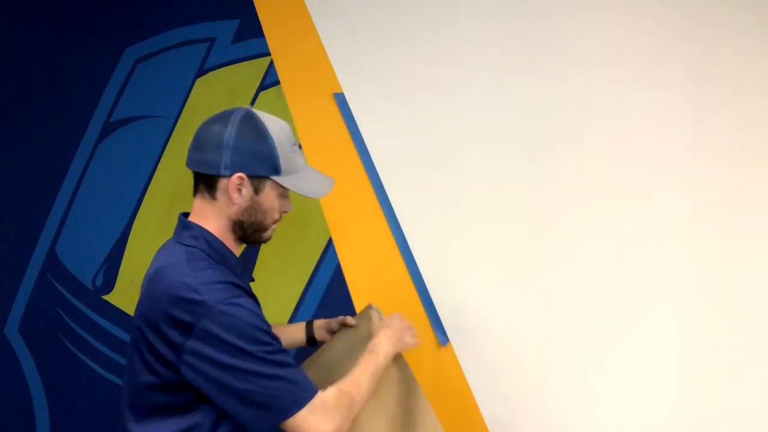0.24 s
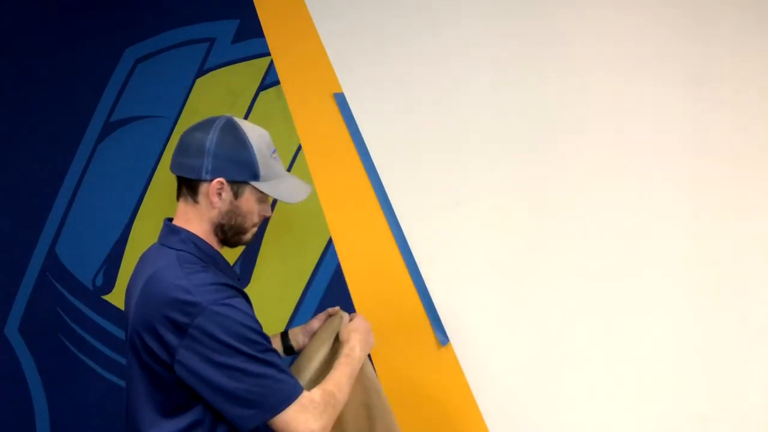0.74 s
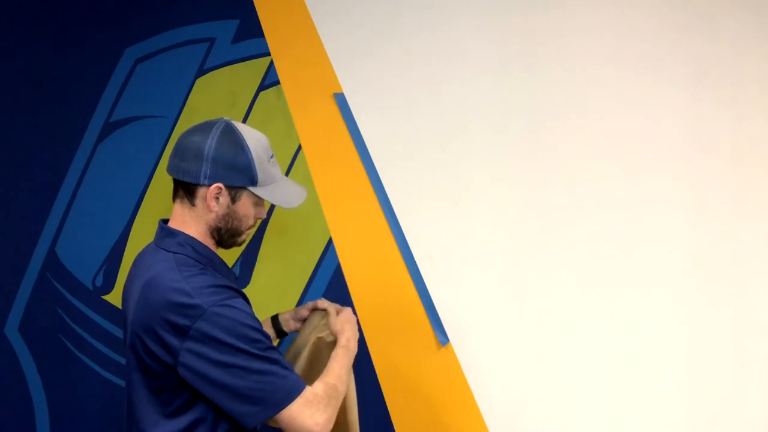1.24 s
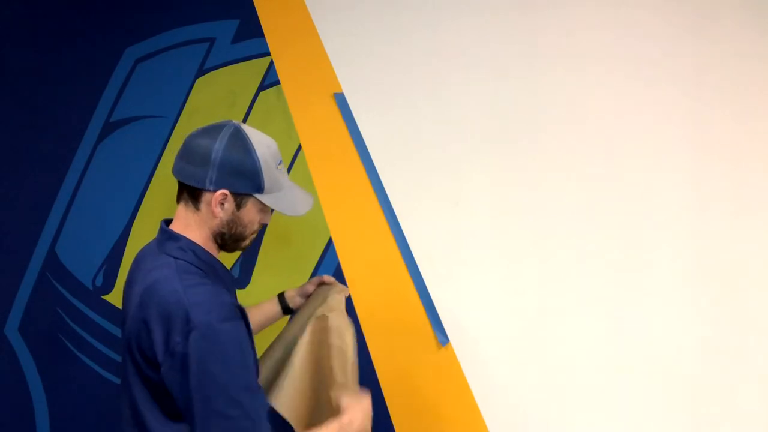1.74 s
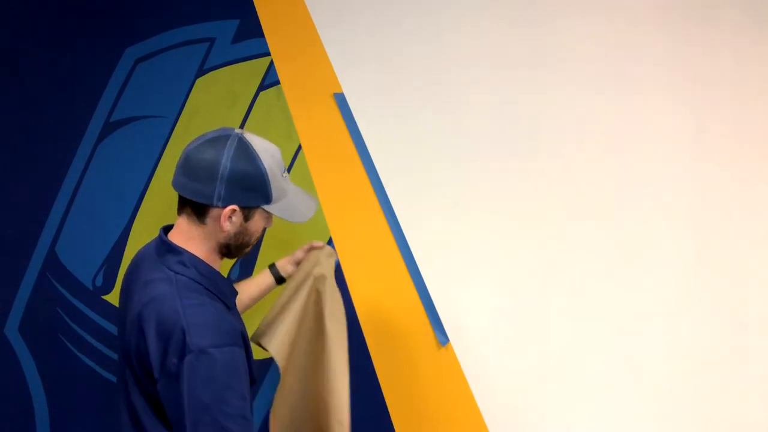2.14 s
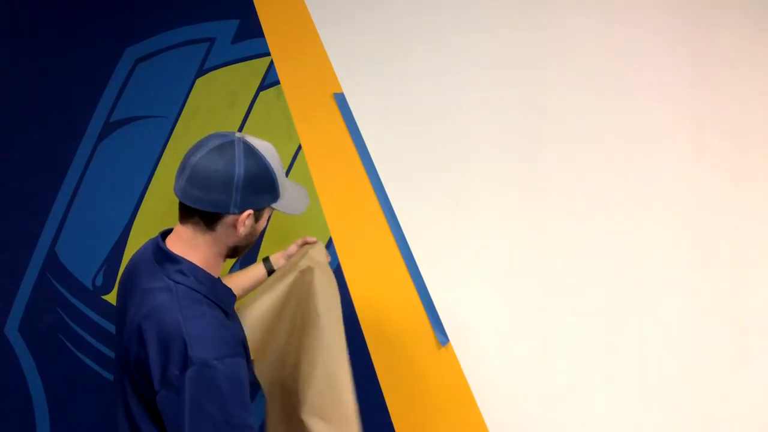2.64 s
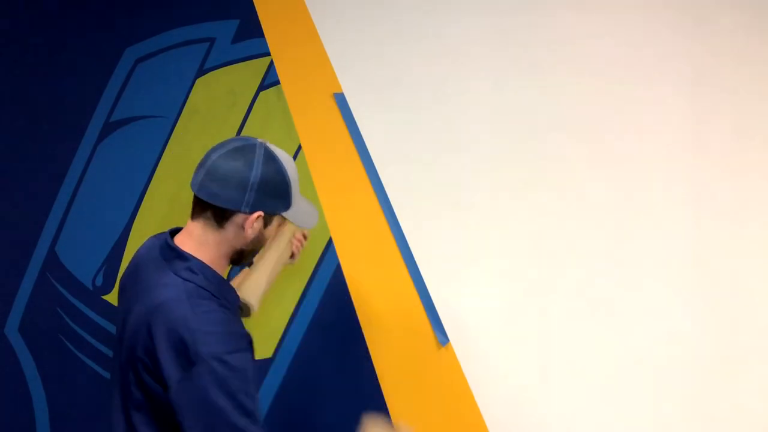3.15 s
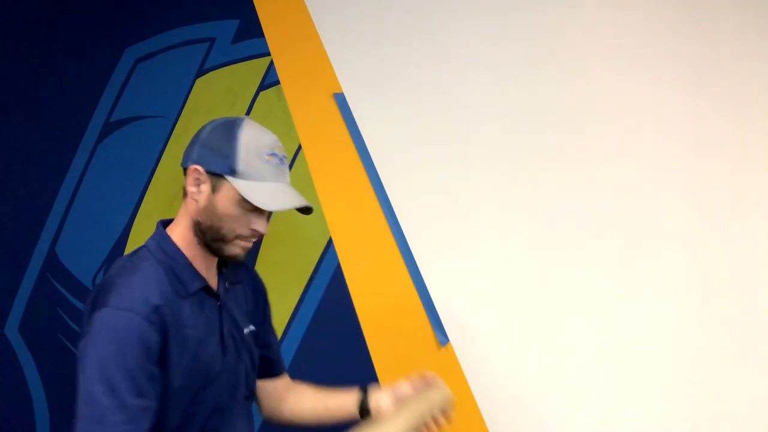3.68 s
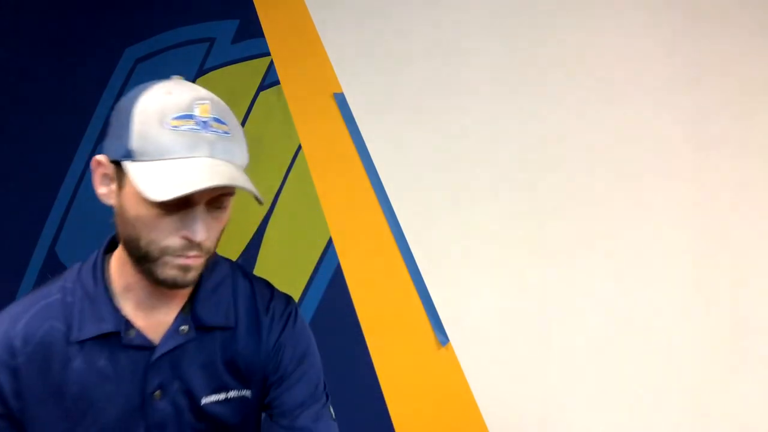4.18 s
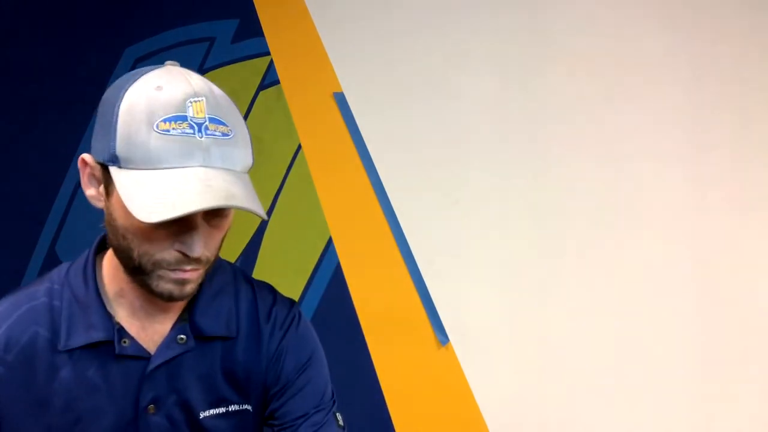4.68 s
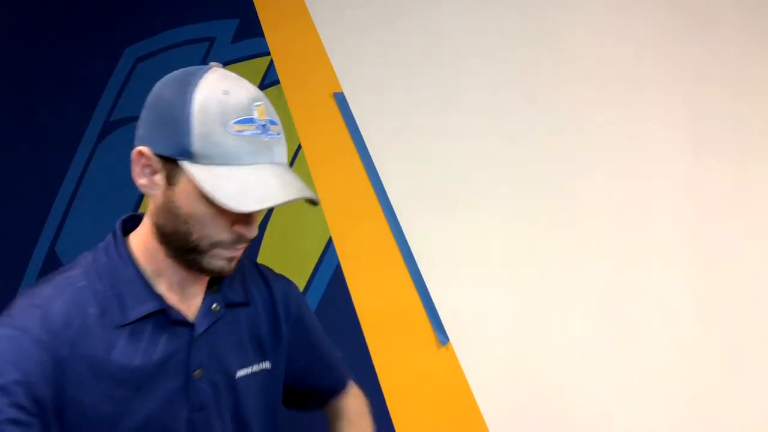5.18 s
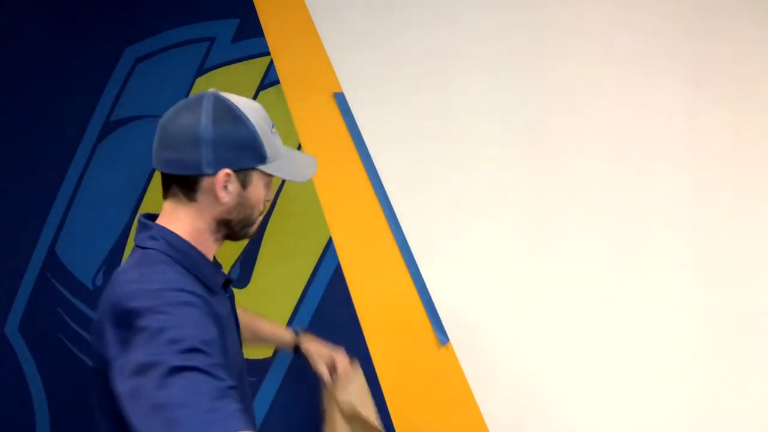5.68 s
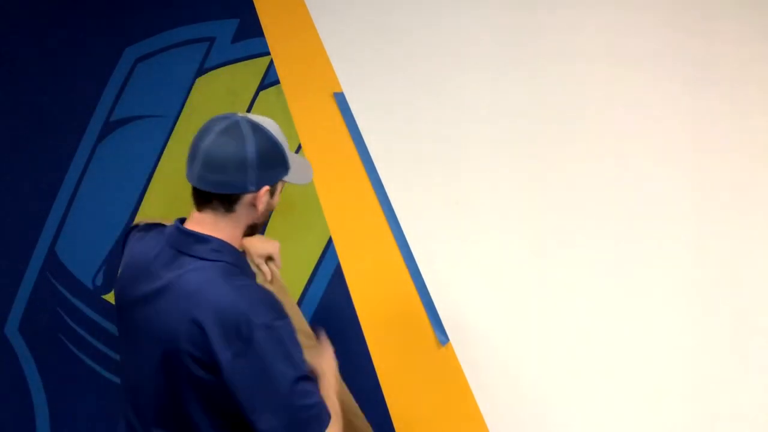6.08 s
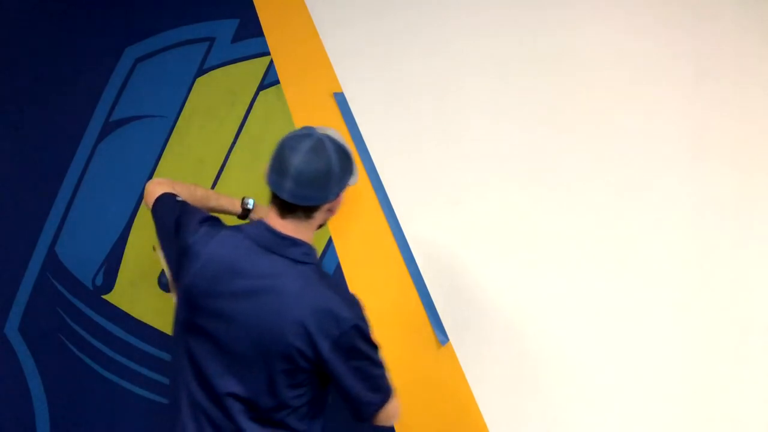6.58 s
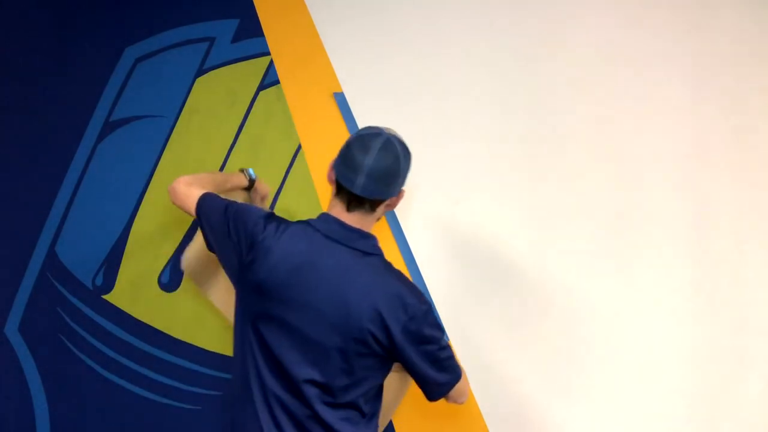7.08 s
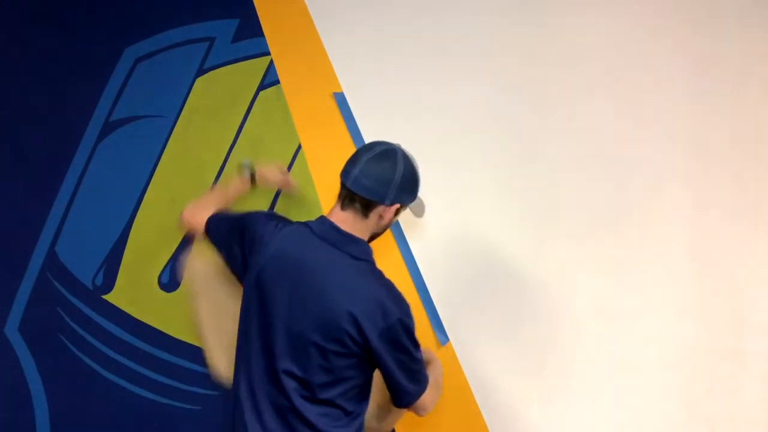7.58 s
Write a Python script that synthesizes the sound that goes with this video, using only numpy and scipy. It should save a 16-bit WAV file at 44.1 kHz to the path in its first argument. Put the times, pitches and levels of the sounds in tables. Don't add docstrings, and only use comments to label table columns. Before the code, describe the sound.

Indoors, thick paper is unrolled and bunched, with dry ticks and single pops growing denser, before a very short, jerky tear. Small rustles lead to a quick woody clunk-clunk as the cardboard roll is set on a table near the microphone. Then near quiet, and a renewed burst of crinkling as the sheet is lifted and pressed to a wall. Lively room echo, low ventilation murmur and hiss, centred sound.

```python
import sys
import numpy as np
from scipy import signal
from scipy.fft import rfft, irfft
from scipy.io import wavfile
from scipy.ndimage import uniform_filter1d

SR = 44100
rng = np.random.default_rng(int(sys.argv[2]) if len(sys.argv) > 2 else 0)


def dump(signal):
    limited = np.clip(np.atleast_2d(signal).T, -1, 1)
    pcm = np.round(limited * 32767).astype(np.int16)
    wavfile.write(sys.argv[1], SR, pcm)


def undo_db(level):
    steps = np.asarray(level, float) / 20
    return 10 ** steps


N = 345303

# f/Hz, level/dB (per Hz)
AIR = [(18, -30), (35, -16), (60, -4.5), (100, -8), (170, -14), (240, -11), (580, -21), (1900, -18),
       (2200, -23), (4080, -22), (10200, -32), (12300, -31), (16000, -40)]
# f/Hz, T60/s
ROOM = [(60, 0.43), (250, 0.7), (600, 0.54), (1500, 0.73), (4000, 0.62), (8000, 0.47), (15000, 0.26)]
# f/Hz, T60/s
TABLE = [(60, 0.38), (150, 0.5), (290, 0.81), (450, 0.15), (700, 0.41), (1000, 0.28), (3000, 0.14)]

# f/Hz, level/dB, T60/s
FIRST_END = [(73.8, -25.5, 0.31), (116.3, -12.5, 0.16), (230, 2, 0.028), (598, -15, 0.026)]
# f/Hz, level/dB, T60/s
ROCKING = [(464, -6, 0.034), (604, -9, 0.06), (770, -17, 0.028), (1025, -6, 0.016), (1880, -34, 0.037)]
# f/Hz, level/dB, T60/s
SECOND_END = [(118, -22, 0.26), (226, -14.5, 0.11), (522, -3, 0.052), (648, -13, 0.049), (928, 3.5, 0.031),
              (1310, -2.5, 0.017)]
# f/Hz, level/dB, T60/s
BOUNCE = [(546, -18, 0.043), (935, 3, 0.011)]
# f/Hz, level/dB, T60/s
SETTLING = [(146.6, -20.5, 0.3), (221.1, -23.5, 0.45), (257, -26, 0.33), (291, -26.5, 0.56),
            (330, -30, 0.58), (385, -1.5, 0.019), (525, -13, 0.033), (574, -30, .3), (636, -31, 0.38),
            (740, -29, 0.25), (900, -32, 0.56), (877, -16.5, 0.064), (1110, -35, 0.34)]

# f/Hz, level/dB (per Hz)
SHEET = [(41, -31), (70, -15.5), (119, -9.5), (220, 1), (482, 1), (576, -1), (650, -7), (840, -29.5),
         (1430, -120)]
# t/s (full), level/dB, rise/s, hold/s
FLIPS = [(.78, -48, 0.12, 0.017), (1.02, -41, 0.15, 0.033), (1.44, -47.5, 0.17, 0.19),
         (2.75, -46.5, 0.27, 0.13), (3.376, -53, .03, 0.026), (3.6, -59, .15, .08),
         (3.726, -50.5, 0.063, 0.03), (4.365, -41, .04, .02), (5.0, -55, .02, 0.0061),
         (5.66, -55, 0.34, 0.066), (5.98, -51, 0.16, 0.033), (6.36, -44, 0.1, 0.03), (6.52, -45, 0.1, 0.12),
         (6.95, -48.5, 0.22, 0.017), (6.75, -55, .1, 0.12), (7.02, -50, .02, 0.16), (7.49, -56, .05, 0.052),
         (7.78, -58, 0.067, .02)]

# f/Hz, level/dB (per Hz)
FIBRES = [(80, -38), (170, -22), (225, -9.5), (360, -21.5), (520, -15.5), (1000, -11.5), (2200, -7.5),
          (2800, -2), (3600, 2), (4600, 2), (7600, -0.5), (8600, -7), (12000, -13), (15700, -19.5),
          (16000, -17)]
# t/s, level/dB
TEAR_EFFORT = [
    (3.008, -55),
    (3.011, -32),
    (3.027, -19),
               (3.037, -14),
    (3.058, -25.5),
    (3.07, -20.5),
    (3.13, -24),
    (3.17, -42),
    (3.22, -37.5),
]
# t/s, extra level/dB
SNAGS = [
    (3.034, 3),
    (3.041, 7),
    (3.051, 7.5),
    (3.065, 6.5),
    (3.073, 0.5),
    (3.087, 11.5),
    (3.106, 2.5),
    (3.114, -2),
    (3.141, 10),
]

# f/Hz, level/dB (per Hz)
PAPER = [(320, -41.5), (550, -13.5), (770, -7.5), (937, -4), (1350, -2), (2400, -1), (4030, 3), (5410, -1),
         (7570, -4.5), (8590, -14), (13100, -24.5), (15700, -20)]
# t/s, peak level/dB, broad level/dB, crispness/dB
TICKS = [(0.207, -31.5, -9, -33), (1.0004, -19, -11.5, -9.5), (1.193, -33, -7, -1),
         (1.9418, -17.5, -26, -5), (2.851, -19, -14, -8), (3.9, -44, -17, -6), (3.941, -46, -11, -5),
         (4.064, -38.5, -12, -24), (4.322, -32, -23, -30), (4.61, -29.5, -5.5, -27.5),
         (4.9927, -29, -9.5, -16), (5.134, -28, -18, -18), (5.2, -18, -15, -17), (5.252, -29, -18, -10),
         (5.722, -26, -8, -18), (6.226, -27.5, -24, -12.5), (7.268, -23, -29, -6), (0.625, -37, -8, -2),
         (0.91, -30, 0, -8), (1.412, -26.5, -0.5, -1.5), (1.53, -28, -14, -6), (1.695, -31.5, -2, -15),
         (1.783, -27, -3, -20), (2.047, -21, -17, -9), (5.2977, -21, -18, -21), (6.3901, -23, -19, -8),
         (7.238, -27, -24, -7)]
# t/s, peak level/dB, broad level/dB,
# crispness/dB
BUCKLES = [(0.325, -46, -17, -6), (0.424, -35, -18, -18), (0.542, -26.5, -6.5, -5),
           (0.5728, -24.5, -26, -5), (0.7207, -21, -12.5, -10), (0.777, -22.5, -21, -5),
           (1.004, -21.5, -10, -12), (1.03, -13, -18, -23), (1.0995, -16.5, -18, -22),
           (1.169, -37, -13, 4), (1.236, -21, -15, -5), (1.345, -28, -18, 1), (1.6, -25, -15, -13),
           (1.643, -26.5, -4, -2), (1.7956, -14.5, -17, -10), (1.872, -23, -6, -4.5),
           (1.943, -23, -17, -7), (2.038, -14, -12, -6), (2.317, -19, -10, -21), (2.493, -18, -14, -14),
           (2.584, -17.5, -18, -18), (2.661, -16, -13.5, -12.5), (2.716, -20, -19.5, -2),
           (2.813, -21, -24.5, -7), (2.851, -17.5, -13.5, -11), (2.905, -22, -26, -3.5),
           (3.346, -33, -22, -7.5), (3.509, -22, -22, -18.5), (3.81, -27.5, -20, -27),
               (3.855, -28.5, -23, -20), (4.209, -31.5, -36, -20), (4.342, -41, -10, -27.5),
               (4.389, -36.5, 7, -18), (4.411, -30.5, 1, -25), (4.7133, -31, -20, -35),
               (4.926, -40, -41.5, -10), (5.2132, -13.5, -14.5, -6), (2.693, -31, -20, -6),
               (5.4985, -18.5, -19, -12), (5.612, -10.5, -19.5, -29), (6.173, -24.5, -17, -15),
               (6.305, -22, -20, -24), (6.374, -23, -16, -14), (6.423, -27, -22, 1), (6.511, -20, -14, -8),
               (6.569, -20, -14, -21), (6.705, -33, -16, -14), (7.5853, -20, -19, -11)]
# t/s (full), level/dB, rise/s, hold/s, crispness/dB
FOLDING = [(0.0, -39.5, .01, 0.015, -20), (0.102, -45.5, 0.072, 0.14, -46), (0.336, -53.5, .01, 0.13, -2),
           (0.424, -46.5, 0.036, 0.075, -10), (0.505, -47, .05, .03, -22), (0.546, -40, 0.032, 0.12, -4),
           (0.73, -41.5, 0.12, 0.22, -0.5), (0.903, -40, 0.18, 0.12, -4.5), (1.024, -32.5, 0.11, 0.036, -9),
           (1.163, -41, 0.11, 0.067, -6), (1.247, -28, .03, 0.02, -6.5), (1.386, -30, 0.14, 0.041, 1.5),
           (1.618, -38, 0.14, 0.029, -4), (1.774, -34.5, 0.37, 0.26, -5), (2.031, -31.5, .05, 0.033, -7),
           (2.21, -42, 0.091, 0.22, -14), (2.323, -38, 0.034, 0.045, -31), (2.428, -41.5, .1, 0.06, -14.5),
           (2.493, -42.5, .03, .02, -16), (2.576, -34.5, 0.035, 0.011, -7), (2.652, -31.5, 0.066, 0.15, -8),
           (2.945, -40, 0.14, 0.11, -3.5)]
# t/s (full), level/dB, rise/s, hold/s, crispness/dB
SETTING = [(3.325, -40, 0.022, 0.037, -5.5), (3.414, -45, .05, 0.031, -9), (3.5, -50.5, 0.091, 0.05, -13),
           (3.63, -70, .1, .04, -20), (3.745, -45.5, 0.26, 0.2, -14.5), (4.086, -43.5, 0.17, 0.015, -15.5),
           (4.208, -50.5, 0.018, 0.013, -1.5), (4.35, -45.5, .03, .02, -21),
           (4.386, -36, 0.0028, .005, -2.5), (4.456, -61.5, .05, 0.033, -19), (4.57, -57.5, .1, 0.1, -8),
           (4.711, -50.5, 0.031, 0.0053, -14), (4.942, -64.5, .03, 0.012, -7), (5, -66, 0.015, .003, 2.5),
           (5.132, -47, .003, .005, -13), (5.183, -52, 0.086, .01, -17)]
# t/s (full), level/dB, rise/s, hold/s, crispness/dB
HANGING = [(5.201, -31.5, .01, .01, -0.5), (5.215, -27.5, 0.022, .003, -15), (5.276, -39.5, .02, 0.15, 2),
           (5.536, -36, 0.44, 0.11, -0.5), (5.619, -32, 0.096, 0.19, -3), (5.865, -39, 0.078, 0.13, -7),
           (5.97, -43, 0.13, 0.17, -22), (6.226, -47, 0.24, 0.015, -4), (6.304, -43.5, 0.036, 0.035, -7),
           (6.377, -34.5, 0.033, 0.17, -1), (6.531, -32, 0.075, 0.22, -3), (6.76, -42.5, 0.17, 0.11, -17),
           (6.946, -41, 0.16, 0.065, -1.5), (7.047, -46.5, .1, 0.041, 8), (7.162, -42, .1, 0.025, 4.5),
           (7.268, -39, 1, 0.045, 2), (7.476, -43.5, 0.091, 0.058, -4), (7.579, -41, .02, 0.0089, -15),
           (7.705, -41.5, 0.16, 0.093, -7)]

SPLIT_HZ = 1803, 9920
DULL_HZ, DULL_SHARE = 4570, 0.42
LIMP_SHARE = 0.1
BROAD_DB, BROAD_PER_DB = -2.5, -0.3
FLEX_DB = -10.5
RISE_DB, SAG_DB_PER_S, RELEASE_DB_PER_S = 30.5, 17, 194
CLUMP_DB = 1.5
SNAP_S, TICK_S = 0.008, 0.002
SNAP_RISE, TICK_RISE = 0.46, 0.17


def evened(x):
    return x / np.sqrt(np.mean(x ** 2) + 1e-20)


def coloured(x, points):
    f, db = np.transpose(points)
    hz = abs(np.fft.fftfreq(8192, 1 / SR))
    gain = undo_db(np.interp(np.log(hz + 1), np.log(f + 1), db))
    spectrum = np.exp(np.conj(signal.hilbert(np.log(gain))))
    taps = np.fft.ifft(spectrum).real[:4096]
    return signal.oaconvolve(x, taps)[:N]


def air():
    return undo_db(-60.5) * evened(coloured(rng.standard_normal(N), AIR))


def room(x, decays, build_s, count):
    f, t60 = np.transpose(decays)
    slot = np.arange(N) / SR / 0.006
    out = np.zeros(N)
    for k in range(count):
        taps = np.zeros(SR)
        at = np.arange(100, SR - 12, 12) + rng.integers(0, 12, (SR - 101) // 12)
        taps[at] = rng.choice([-1., 1.], len(at))
        hz, t, z = signal.stft(taps, SR, nperseg=256)
        band_t60 = np.interp(np.log(hz + 1), np.log(f), t60)[:, None]
        z *= undo_db(-60 * t / band_t60) * np.minimum(t / build_s, 1)
        tail = signal.istft(z, SR, nperseg=256)[1]
        share = np.cos(np.pi / 2 * np.clip((slot - k) % count - 1, -1, 1))
        out += signal.oaconvolve(x * share, tail / np.linalg.norm(tail))[:N]
    return out


def squeak():
    start_s, length_s, hz, sag_hz = 7.495, 0.058, 1047, 25
    u = np.clip((np.arange(N) / SR - start_s) / length_s, 0, 1)
    turns = np.cumsum(hz - sag_hz * u) / SR
    return undo_db(-48) * np.sqrt(abs(np.sin(np.pi * u))) * np.sin(2 * np.pi * turns)


def blow(s, modes, rise):
    t = np.maximum(np.arange(N) / SR - s, 0)
    ring = sum(undo_db(db - 60 * t / t60) * np.sin(2 * np.pi * hz * t) for hz, db, t60 in modes)
    return ring * (1 - np.exp(-t / rise)) ** 2


def knock():
    first = blow(4.387, FIRST_END, rise=0.002)
    rock = blow(4.392, ROCKING, rise=0.0016)
    rebound = undo_db(-4) * blow(4.402, ROCKING, rise=0.0017)
    second = blow(4.410, SECOND_END, rise=0.0018)
    hop = blow(4.414, BOUNCE, rise=0.0007)
    settle = blow(4.420, SETTLING, rise=0.00089)
    return first + rock + rebound + second + hop + settle


def strokes(rows):
    t, power = np.arange(0, N, 32) / SR, 1e-12
    for s, db, rise, hold in rows:
        swell = RISE_DB * np.minimum(t - s, 0) / max(rise, 0.002)
        sag = SAG_DB_PER_S * np.maximum(t - s, 0)
        release = RELEASE_DB_PER_S * np.maximum(t - s - hold, 0)
        power = power + undo_db(2 * (db + swell - sag - release))
    return np.interp(np.arange(N) / SR, t, 10 * np.log10(power))


def flexing(broad_db):
    lumps = evened(uniform_filter1d(rng.standard_normal(N), 700))
    body = evened(coloured(undo_db(4.2 * lumps) * rng.standard_normal(N), SHEET))
    level = np.hypot(undo_db(broad_db + FLEX_DB), undo_db(strokes(FLIPS)))
    return body * level * undo_db(-8.0)


def swarm(levels_db, per_s, spread_db, clump_db):
    sizes = undo_db(spread_db * np.minimum(rng.exponential(1, N), 3.5))
    ticks = (rng.random(N) < per_s / SR) * sizes
    ticks = signal.lfilter([1], [1, -0.9], ticks)
    clumps = uniform_filter1d(uniform_filter1d(rng.standard_normal(N), 500), 500)
    envelope = evened(ticks * undo_db(clump_db * evened(clumps)))
    noise = rng.standard_normal((3, N))[[0, 1, 2, 0]]
    return envelope * noise * undo_db(levels_db)


def tear_effort():
    t = np.arange(N) / SR
    jerks = sum(db * np.exp(-((t - s) / 0.0018) ** 2) for s, db in SNAGS)
    return np.interp(t, *np.transpose(TEAR_EFFORT), left=-120, right=-120) + jerks


def tearing():
    balance_db = np.array([[0], [-9], [-3.5], [0]])
    levels_db = tear_effort() + balance_db
    return swarm(levels_db, per_s=8000, spread_db=1.6, clump_db=CLUMP_DB / 2) * undo_db(0.5)


def hands():
    s, db, rise, hold, crisp = np.transpose(FOLDING + SETTING + HANGING)
    middle = LIMP_SHARE * (crisp + 6)
    broad = BROAD_DB + BROAD_PER_DB * (db + 39)
    upper = DULL_SHARE * (crisp + 5)
    return np.array([strokes(zip(s, db + extra, rise, hold)) for extra in (middle, broad, crisp, upper)])


def flattened(bursts, shape):
    z = rfft(bursts)
    even = irfft(z / np.sqrt(uniform_filter1d(abs(z) ** 2, size=45)), len(shape))
    even = even * (np.arange(len(shape)) < len(shape) // 2)
    return even * np.linalg.norm(shape) / np.linalg.norm(even, axis=1, keepdims=True)


def snaps():
    out, t = np.zeros((4, N + 4000)), np.arange(4000) / SR
    rows = [(*r, SNAP_S, SNAP_RISE) for r in BUCKLES]
    rows += [(*r, TICK_S, TICK_RISE) for r in TICKS]
    noises = rng.standard_normal((len(rows), 3, 4000))
    for (s, db, broad, fine, length, rise), noise in zip(rows, noises):
        shape = np.minimum(t / (rise * length), 1) * np.exp(-t / length)
        shape = shape * (0.006 / length) ** 0.4
        burst = flattened(shape * noise, shape)
        balance_db = np.array([[0], [broad + 8], [fine + 8], [DULL_SHARE * (fine + 13)]])
        at = round(s * SR)
        out[:, at:at + 4000] += undo_db(db - 9.5 + balance_db) * burst[[0, 1, 2, 0]]
    return out[:, :N]


def small_folds(x):
    low, high = (signal.butter(3, DULL_HZ, kind, fs=SR, output="sos") for kind in ("lowpass", "highpass"))
    return [signal.sosfilt(low, x[0]) + signal.sosfilt(high, x[3]), x[1], x[2]]


def by_fold_size(x, colour):
    edges = [(SPLIT_HZ, "bandpass"), (SPLIT_HZ[0], "lowpass"), (SPLIT_HZ[1], "highpass")]
    click = coloured(np.arange(N) == 0, colour)
    out = np.zeros(N)
    for (hz, kind), row in zip(edges, x):
        part = signal.butter(3, hz, kind, fs=SR, output="sos")
        gain = np.linalg.norm(signal.sosfilt(part, click))
        out += signal.sosfilt(part, coloured(row, colour)) / gain
    return out


def scene():
    folds_db = hands()
    handling = swarm(folds_db, per_s=2500, spread_db=2.5, clump_db=CLUMP_DB) * undo_db(-5.5)
    folds = by_fold_size(small_folds(handling + snaps()), PAPER[:-1])
    tear = by_fold_size(tearing(), FIBRES[:-1])
    paper = folds + tear + flexing(folds_db[1]) + squeak()
    table = knock()
    paper_echoes = undo_db(1.5) * room(paper, ROOM, build_s=0.002, count=8)
    table_echoes = undo_db(-17) * room(table, TABLE, build_s=0.019, count=3)
    mono = paper + table + paper_echoes + table_echoes + air()
    return np.array([mono, mono])


def roll_off(x):
    return signal.sosfilt(signal.butter(12, 16670, fs=SR, output="sos"), x)


def record(dry):
    cut = signal.sosfilt(signal.butter(4, 48, "highpass", fs=SR, output="sos"), dry)
    limited = np.tanh(cut / 1.4) * 1.4
    band_limit = signal.firwin(511, 15850, fs=SR)[None]
    mix = signal.oaconvolve(limited, band_limit, "same")
    return roll_off(mix)


dry = scene()
out = record(dry)
dump(out)
```